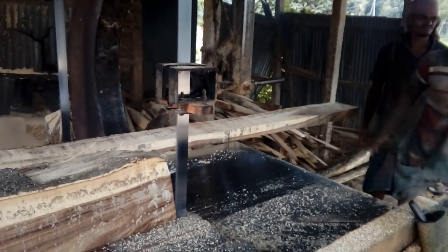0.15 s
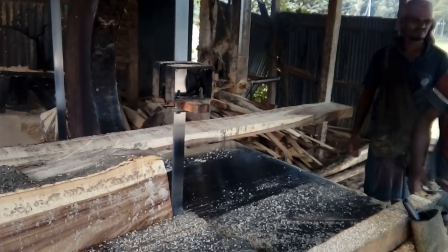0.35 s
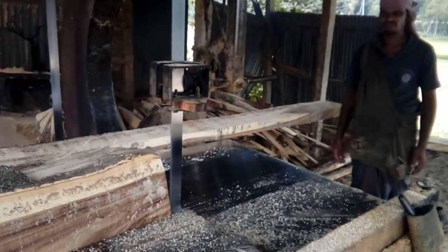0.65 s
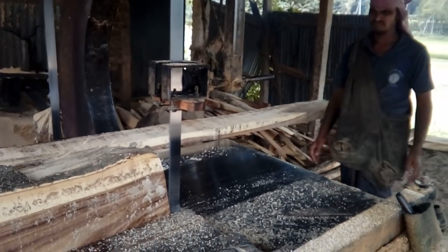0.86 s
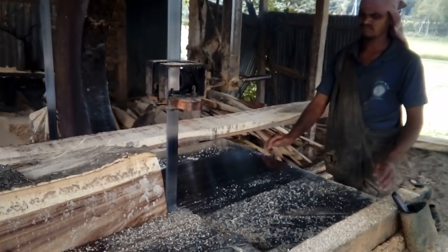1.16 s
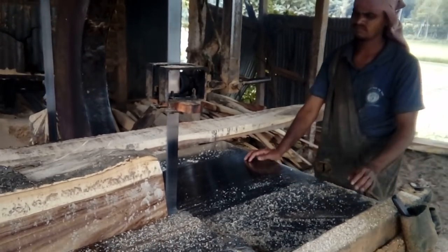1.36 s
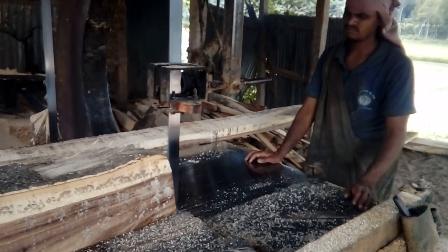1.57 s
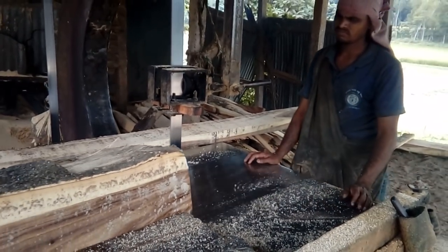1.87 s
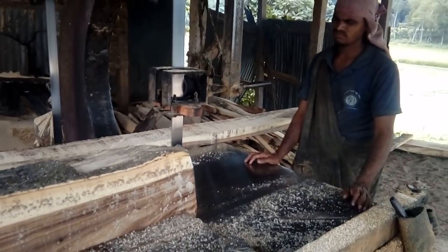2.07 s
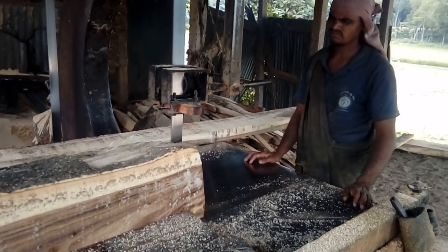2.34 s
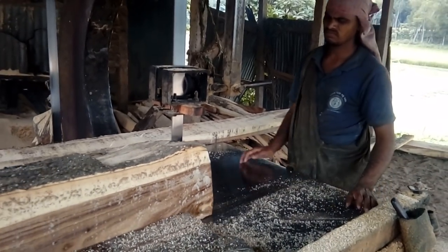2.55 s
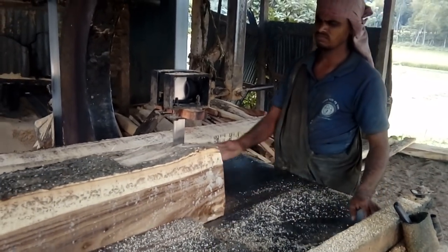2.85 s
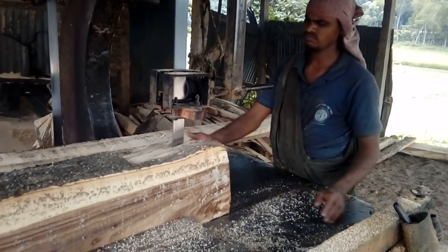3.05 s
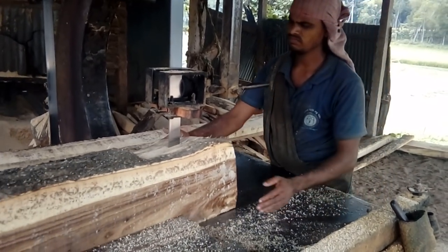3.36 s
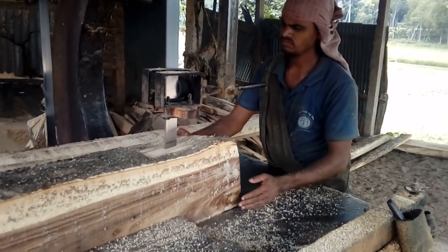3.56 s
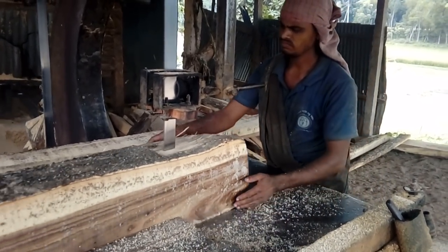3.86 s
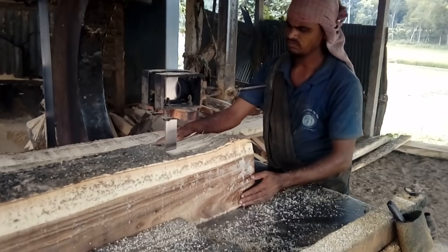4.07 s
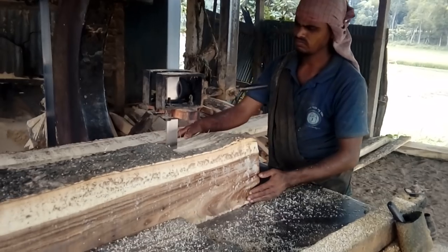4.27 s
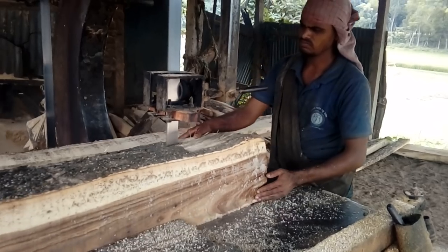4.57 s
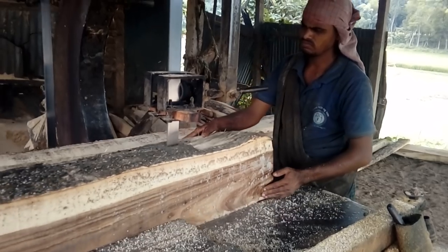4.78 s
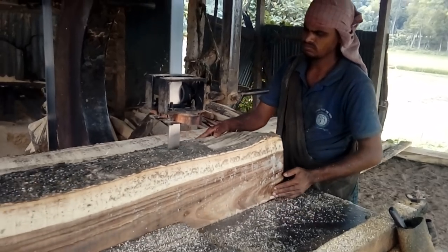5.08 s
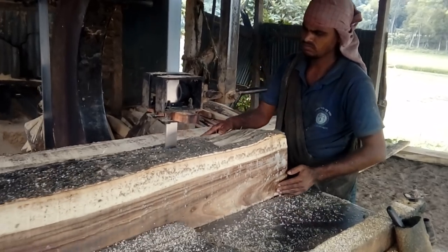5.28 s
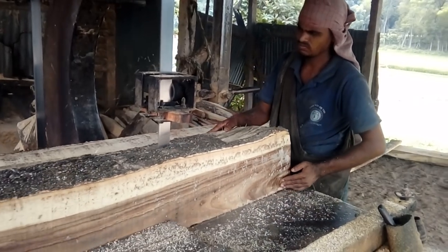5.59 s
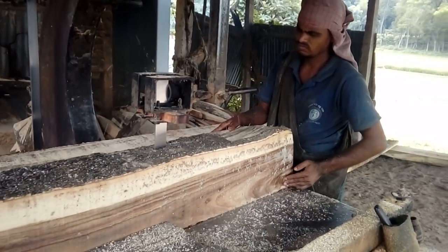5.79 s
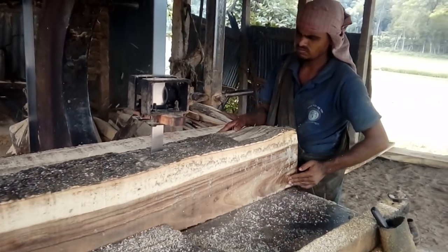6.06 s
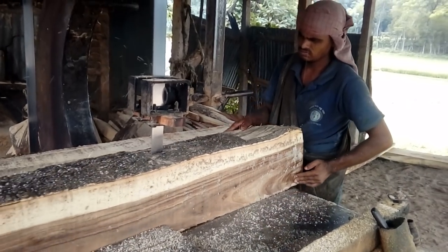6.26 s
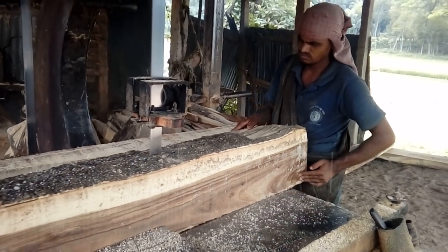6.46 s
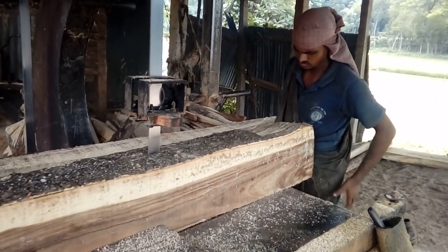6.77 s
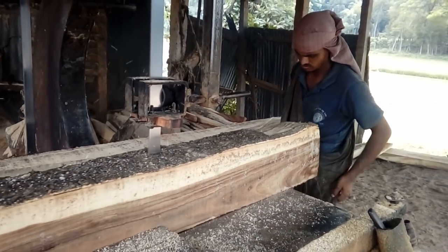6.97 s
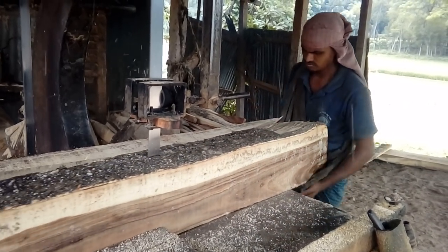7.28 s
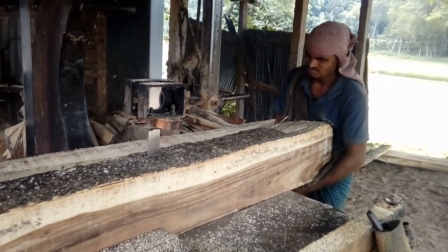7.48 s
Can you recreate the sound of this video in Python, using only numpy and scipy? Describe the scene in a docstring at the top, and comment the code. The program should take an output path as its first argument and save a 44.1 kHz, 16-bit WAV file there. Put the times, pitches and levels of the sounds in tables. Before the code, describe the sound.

Loud sawmill band saw cutting a log: steady buzzing rasp, high steel ringing, a hiss at contact, then squeals and drumming while its pitch slowly sinks.

```python
"""An open-sided shed: a big band saw runs while a log is pushed through it.
The blade rasps through its guides over hum and frame ringing, made of sines and filtered noise.
At 1.6 s the teeth meet the wood: tooth-paced noise hisses as sawdust, high band modes ring briefly.
Friction tones groan and whine as the log enters; from about 3 s the kerf grips fully, the band
squeals and a tooth tone drums. The wheels slowly lose speed, and every tone tied to them sinks."""
import sys
import numpy as np
from scipy import signal
from scipy.fft import rfft, irfft, next_fast_len
from scipy.io import wavfile
from scipy.ndimage import uniform_filter1d, minimum_filter1d

SR = 44100
rng = np.random.default_rng(int(sys.argv[2]) if len(sys.argv) > 2 else 0)


def generate_wav(signal):
    """Clip the signal to [-1, 1] and save it as 16-bit WAV at the path in sys.argv[1]."""
    frames = np.transpose(np.atleast_2d(signal))
    scaled = np.clip(frames, -1, 1) * 32767
    pcm = np.round(scaled).astype(np.int16)
    wavfile.write(sys.argv[1], SR, pcm)


N = 336483


def gain_of(db):
    """Decibels to an amplitude factor."""
    return 10 ** (np.asarray(db) / 20)


def evened(x):
    """Scales to rms 1."""
    return x / np.sqrt(np.mean(x ** 2) + 1e-20)


def curves(rows):
    """Columns after t/s, interpolated to every sample."""
    t_s, *columns = np.transpose(rows)
    return [np.interp(np.arange(N) / SR, t_s, column) for column in columns]


def shaped(x, gain):
    """Filters x by a gain that is a function of f/Hz."""
    size = next_fast_len(N + 4096)
    spectrum = rfft(x, size) * gain(np.fft.rfftfreq(size, 1 / SR))
    return irfft(spectrum, size)[:N]


def coloured(x, colour):
    """Filters x by a colour table on a log frequency axis, at rms 1."""
    hz, db = np.transpose(colour)
    return evened(shaped(x, lambda f: gain_of(np.interp(np.log(f + 1), np.log(hz), db))))


def drift(rate_hz, size=4096):
    """Slow random signal of rms 1, drawn on a coarse grid."""
    hz = np.fft.rfftfreq(size, N / SR / size)
    spectrum = rfft(rng.standard_normal(size)) * np.exp(-(hz / rate_hz) ** 2)
    return np.interp(np.arange(N) * size / N, np.arange(size), evened(irfft(spectrum)))


def ringing(modes, load):
    """Random blows (noise) keep modes ringing; load 0-1 moves power from free to loaded levels."""
    def response(f, column):
        power = 0
        for mode in modes:
            hz, width_hz = mode[:2]
            offset = (f - hz) / width_hz * np.sqrt(2)
            power = power + gain_of(mode[column]) ** 2 / width_hz / (1 + offset ** 2) ** 3
        return np.sqrt(power)

    def rung(column):
        noise = shaped(rng.standard_normal(N), lambda f: response(f, column))
        total_gain = np.linalg.norm(gain_of([mode[column] for mode in modes]))
        return evened(noise) * total_gain

    return np.sqrt(1 - load) * rung(2) + np.sqrt(load) * rung(3)


def teeth(tooth_turns, depth, flutter_db):
    """A puff of noise as each tooth passes, uneven as the band flutters."""
    puffs = 1 + depth * np.cos(2 * np.pi * tooth_turns)
    return puffs * gain_of(flutter_db * drift(36)) * rng.standard_normal(N)


def reflections(x, count=80):
    """Small hard faces of saw and table return early echoes of the treble, which comb it."""
    delay_s, weight = rng.uniform(.001, .02, count), rng.standard_normal(count)
    taps = np.zeros(SR // 4)
    taps[(delay_s * SR).astype(int)] = weight
    echoes = signal.fftconvolve(x, taps / np.linalg.norm(taps))[:N]
    treble_echoes = shaped(echoes, lambda f: np.interp(f, [4300, 5500], [0, .38]))
    return evened(x + treble_echoes)


def wavering_tone(hz, rough, width_hz, octave_db, wobble_hz):
    """Tone on a pitch curve: wobbling core in a restless skirt, with a weaker octave."""
    a, b, wobble = (drift(width_hz)[:len(hz)] for _ in range(3))
    rough = np.clip(rough, 0, 1)  # share of power in the skirt
    sway = np.sqrt(1 - rough) + np.sqrt(rough / 2) * (a + 1j * b)
    turn = np.exp(2j * np.pi * np.cumsum(hz + wobble_hz * wobble) / SR)
    return np.sqrt(2) * (sway * (turn + gain_of(octave_db) * turn ** 2)).real


def add(mix, start_s, sound):
    """Mixes a sound in at its time."""
    part = mix[max(round(start_s * SR), 0):][:len(sound)]
    part += sound[:len(part)]


def swelling_tone(start_s, loudest_s, end_s, hz, db, glide_per_s, **timbre):
    """One tone: a rounded swell up and down while the pitch glides."""
    t = np.arange(start_s, end_s, 1 / SR)
    swell = np.interp(t, [start_s, loudest_s, end_s], [0, 1, 0]) ** .65
    pitch_hz = hz * (1 + glide_per_s * (t - loudest_s))  # equals hz at the loudest moment
    return start_s, gain_of(db) * swell * wavering_tone(pitch_hz, **timbre)


# frame and wheel-guard modes: f/Hz, width/Hz, free level/dB, loaded level/dB
FRAME_MODES = [(257, 27, -59.5, -76), (321.5, 13, -50.5, -70), (424, 64, -52, -46.5),
               (535.7, 15, -40, -40.5), (620, 20, -39.5, -50), (758.5, 26, -33.5, -36),
               (862.4, 39, -33.5, -35), (1113.4, 21, -38.5, -35), (1174, 22, -36, -40.5),
               (1297, 13, -34.5, -46), (1445, 27, -34, -38), (1630, 100, -36, -68), (1946, 32, -55, -32.5),
               (2167, 65, -29, -39.5), (2350, 38, -32, -39)]


def frame(load):
    """Frame and wheel guards ring under random blows."""
    return ringing(FRAME_MODES, load)


# wheel hum: multiple of wheel speed, free level/dB, loaded level/dB
WHEEL_HUM = [(4, -62, -61), (5, -68, -72), (6, -60, -63), (7, -52, -57), (8, -53.5, -50), (9, -57, -62),
             (11, -63, -61.5), (16, -64, -87.5), (19, -56.5, -62.5)]


def wheel_hum(turns, load, waver_db=.4):
    """Unbalanced wheels shake the frame at multiples of their speed."""
    hum = np.zeros(N)
    for multiple, free_db, loaded_db in WHEEL_HUM:
        level_db = free_db + load * (loaded_db - free_db) + waver_db * drift(4.7)
        hum += gain_of(level_db) * np.sin(2 * np.pi * (round(multiple) * turns + rng.random()))
    return np.sqrt(2) * hum


# drive notes: multiple of wheel speed, free level/dB
DRIVE_NOTES = [(19.25, -52), (32, -43), (37.25, -37.5), (45, -34.5)]


def drive(turns, load, waver_db=2, drop_db=10):
    """The drive sings at multiples of wheel speed, drop_db weaker at full load."""
    notes = np.zeros(N)
    for multiple, free_db in DRIVE_NOTES:
        level_db = free_db - drop_db * load + waver_db * drift(3.8)
        notes += gain_of(level_db) * np.sin(2 * np.pi * multiple * turns)
    return np.sqrt(2) * notes


# log boom spectrum: f/Hz, relative density level/dB
BOOM_COLOUR = [(20, -30), (42, -29), (130, -25), (190, -24), (215, -46), (255, -27), (310, -21.5),
               (385, -14.5), (490, -10.5), (545, -3.5), (700, -0.5), (880, -4.5), (980, -10), (1500, -49)]


def boom(tooth_turns, level_db):
    """Tooth puffs boom low in the log."""
    puffs = teeth(tooth_turns, depth=.58, flutter_db=1)
    return gain_of(level_db) * coloured(puffs, BOOM_COLOUR)


# blade rasp spectrum: f/Hz, relative density level/dB
RASP_COLOUR = [(240, -55), (500, -20.5), (800, -5.5), (970, -5), (1130, 0), (1350, 0.5), (1650, 0.5),
               (1950, 1), (2300, -2.5), (2520, 0.5), (2740, -5.5), (3300, -14), (4500, -45), (9000, -57)]


def rasp(tooth_turns, level_db):
    """Tooth puffs rasp in the midrange."""
    puffs = teeth(tooth_turns, depth=.29, flutter_db=.72)
    return gain_of(level_db) * coloured(puffs, RASP_COLOUR)


# hiss spectrum: f/Hz, relative density level/dB
HISS_COLOUR = [(1500, -45.5), (3100, -1.5), (3400, 2), (4150, -0.5), (4700, -6.5), (5400, -11), (5950, -14),
               (6450, -12), (7050, -20), (7900, -25), (9800, -30.5), (11000, -37), (13700, -45),
               (16000, -53)]


def hiss(tooth_turns, level_db, surge_db=.5):
    """Tooth puffs hiss in the treble, combed by near reflections, with slow random surges."""
    puffs = teeth(tooth_turns, depth=.18, flutter_db=.71)
    surging = gain_of(level_db + surge_db * drift(7.8))
    return surging * reflections(coloured(puffs, HISS_COLOUR))


# sawdust spectrum: f/Hz, relative density level/dB
DUST_COLOUR = [(2500, -17), (5500, 5.5), (7100, -5.5), (7900, 2), (8800, -9.5), (10000, -10),
               (11200, -15.5), (13700, -17.5), (16000, -15.5)]


def dust(tooth_turns, bite, level_db=-32.5):
    """Thrown sawdust hisses in proportion to the teeth in the wood."""
    puffs = teeth(tooth_turns, depth=.21, flutter_db=1.6)
    return gain_of(level_db) * bite * reflections(coloured(puffs, DUST_COLOUR))


# steel band modes: f/Hz, width/Hz, free relative level/dB, in-kerf relative level/dB
BAND_MODES = [(2867, 72, -2.5, -6), (2934, 49, -2.5, -5.5), (2975, 46, -6.5, -16), (3012, 41, -4, -4),
              (3176, 55, -9, -7.5), (3360, 45, -26, -12), (3220, 65, -9.5, -15), (3900, 54, -37, -15),
              (4027, 29, -10.5, -13.5), (4250, 20, -32, -18), (4494, 21, -35, -12.5),
              (4890, 150, -23, -14.5), (5350, 49, -34, -21), (6370, 220, -25, -21)]


def band_ring(grip, level_db):
    """The steel band rings; the kerf's grip shifts power between its modes."""
    return gain_of(level_db) * ringing(BAND_MODES, grip)


# working effort before grip offsets: t/s, boom level/dB, rasp level/dB, band ring level/dB
EFFORT = [(0.0, -23, -19, -18.5), (0.6, -22, -20, -17.5), (0.72, -19, -19.8, -18), (1.08, -22, -20, -20.5),
          (1.2, -21.2, -18.5, -15.5), (1.44, -20.0, -18.5, -20), (1.8, -22, -18.5, -21.5),
          (2.64, -20.5, -19.5, -19.5), (2.88, -22.5, -21.1, -13), (3.12, -23.5, -20.5, -15.5),
          (3.84, -24.2, -21, -15.4), (5.16, -24.5, -20.5, -18.5), (5.28, -25, -20.5, -15),
          (6.6, -23.5, -19.6, -16), (6.72, -23.5, -21.5, -16.7), (7.08, -25.5, -18.5, -18),
          (7.2, -22, -18.9, -15.3), (7.6, -24, -20.8, -18.5)]


def sawing(turns, bite, grip, teeth_per_turn=41):
    """Passing teeth boom, rasp, hiss, throw dust and ring the band; grip shifts the balance."""
    boom_db, rasp_db, ring_db = curves(EFFORT)
    tooth_turns = teeth_per_turn * turns

    def gripped(free_db, kerf_db):
        """Free-running to in-kerf level, by grip."""
        return free_db + grip * (kerf_db - free_db)

    return (boom(tooth_turns, boom_db + gripped(-5.5, -5.5))
            + rasp(tooth_turns, rasp_db + gripped(.2, .5))
            + hiss(tooth_turns, gripped(-20.5, -17.5))
            + dust(tooth_turns, bite)
            + band_ring(grip, ring_db + gripped(-4.5, -2)))


def groan():
    """The log groans on a rough, wide friction tone as the band works its way in."""
    out = np.zeros(N)
    add(out, *swelling_tone(start_s=1.3, loudest_s=2.2, end_s=3.3, hz=385, db=-41.5, glide_per_s=.0119,
                            rough=.77, width_hz=27, octave_db=-20, wobble_hz=2.7))
    return out


def first_bite(start_s=1.6, peak_s=1.77, end_s=2.5, level_db=-41, count=30):
    """Teeth first meeting the wood set many thin, high band modes ringing."""
    pitches_hz = np.linspace(6600, 12000, count) + rng.uniform(-70, 70, count)
    levels_db = np.linspace(0, -12, count)
    modes = [(hz, 45, db, db) for hz, db in zip(pitches_hz, levels_db)]
    swell = np.interp(np.arange(N) / SR, [start_s, peak_s, end_s], [0, 1, 0])
    return gain_of(level_db) * swell * evened(ringing(modes, 0))


# blade whines: start t/s, loudest t/s, end t/s, f/Hz, level/dB before trim, glide/(share of f per s)
WHINES = [(1.8, 2.0, 2.6, 2276, -27, -.035), (1.85, 2.15, 3.0, 566, -29, -.05),
          (2.25, 2.75, 2.93, 2205, -22, -.025), (2.4, 2.98, 3.45, 1099, -29.5, -.01),
          (3.4, 3.75, 4.7, 1068, -32, -.012), (3.8, 4.35, 5.2, 2148, -28.5, -.02),
          (4.0, 5.0, 6.5, 1975, -31, 0), (4.7, 4.9, 5.5, 1069, -29, -.015), (4.9, 5.6, 6.4, 425, -42, 0),
          (5.05, 5.33, 5.9, 2074, -26, -.055), (5.5, 5.8, 6.9, 750, -33.5, 0),
          (6.0, 7.03, 7.25, 1097, -28, -.005), (6.8, 7.3, 7.9, 1892, -26.5, -.025),
          (6.9, 7.25, 7.9, 623, -30.5, -.04), (7.0, 7.3, 7.9, 470, -38, -.04),
          (7.1, 7.4, 7.9, 2086, -28.5, -.06), (7.25, 7.45, 7.9, 1072, -28, -.04)]


def whines(trim_db=.6):
    """The blade rubs in the wood: friction tones, most of them sagging in pitch."""
    out = np.zeros(N)
    for start_s, loudest_s, end_s, hz, db, glide_per_s in WHINES:
        add(out, *swelling_tone(start_s, loudest_s, end_s, hz, db + trim_db, glide_per_s,
                                rough=.28, width_hz=13, octave_db=-9, wobble_hz=3))
    return out


def hum_swell():
    """The low wheel hum swells for a second as the log enters: one nearly pure tone."""
    out = np.zeros(N)
    add(out, *swelling_tone(start_s=1.97, loudest_s=2.15, end_s=3.0, hz=114, db=-44, glide_per_s=0,
                            rough=.08, width_hz=8, octave_db=-30, wobble_hz=.35))
    return out


# squeals of band against kerf: loudest t/s, level/dB
SQUEALS = [(3.05, -27.5), (3.28, -19), (3.701, -20.5), (4.22, -21.5), (4.8, -17.5), (5.13, -19.5),
           (5.6, -20), (6.15, -24), (6.42, -22), (6.919, -19), (7.24, -21), (7.6, -26)]


def squeals(hz=3193, rise_per_s=.045, attack_s=.2, release_s=.26):
    """The band rubs the kerf: ragged squeals that each climb a little."""
    out = np.zeros(N)
    for loudest_s, db in SQUEALS:
        start_s, end_s = loudest_s - attack_s, loudest_s + release_s
        add(out, *swelling_tone(start_s, loudest_s, end_s, hz, db, rise_per_s,
                                rough=.28, width_hz=32, octave_db=-26, wobble_hz=11))
    return out


# tone of the teeth in the deep cut: t/s, f/Hz, level/dB before trim
TOOTH_TONE = [(3.4, 650.1, -27.5), (3.76, 656.5, -23.0), (4.12, 651.3, -29), (4.24, 644, -25.5),
              (4.96, 656, -22), (5.68, 649, -22), (6.28, 646, -27), (6.4, 642, -23.5), (6.52, 643, -41)]


def tooth_tone(trim_db=-3, fade_s=.08):
    """Deep in the log the teeth drum out a nearly pure tone."""
    hz, db = curves(TOOTH_TONE)
    t = np.arange(N) / SR
    inside_s = np.minimum(t - TOOTH_TONE[0][0], TOOTH_TONE[-1][0] - t)
    sounding = np.clip(1 + inside_s / fade_s, 0, 1)  # fades lie outside the table's span
    tone = wavering_tone(hz, rough=.05, width_hz=11.6, octave_db=-14, wobble_hz=2)
    return sounding * gain_of(db + trim_db) * tone


# band wheel speed: t/s, speed/(turns per s)
WHEEL_SPEED = [(0, 16.76), (2.4, 16.5), (3.5, 16.12), (5, 15.8), (6, 15.43), (7.63, 14.93)]
# progress of the cut: t/s, teeth in the wood/0-1, band gripped by the kerf/0-1
CUT = [(0, 0.2, 0.1), (1.62, 0, 0), (1.65, 0.7, 0), (1.82, .85, 0), (2.1, 0.74, 0.26), (2.65, 0.83, 0.32),
       (3.1, 0.83, 0.95), (7.63, 0.63, 0.98)]


def scene():
    """Wheel speed and cut drive the saw, heard as one source from beside the table."""
    speed, = curves(WHEEL_SPEED)
    turns = np.cumsum(speed) / SR
    bite, grip = np.clip(curves(CUT), 0, 1)
    machine = frame(grip) + wheel_hum(turns, grip) + hum_swell() + drive(turns, grip)
    friction = groan() + whines() + squeals()
    saw = machine + sawing(turns, bite, grip) + first_bite() + friction + tooth_tone()
    return np.array([saw, saw])


def limited(x, size=200):
    """Fast limiter: eases the gain down around peaks above .96."""
    room = np.minimum(1, .96 / (abs(x).max(0) + 1e-9))
    return x * uniform_filter1d(minimum_filter1d(room, 2 * size + 1), size)


def record(dry, port_hz=15150, port_width_hz=750, port_db=12, edge_hz=15850):
    """A mono microphone whose port rings in the top treble; then limiter and band limit."""
    def port(f):
        return gain_of(port_db * np.exp(-((f - port_hz) / port_width_hz) ** 2))

    heard = np.array([shaped(x, port) for x in dry])
    low_pass = signal.firwin(1023, edge_hz, window=("kaiser", 9), fs=SR)
    return signal.oaconvolve(limited(heard), low_pass[None], "same")


dry = scene()
out = record(dry)
generate_wav(out)
```